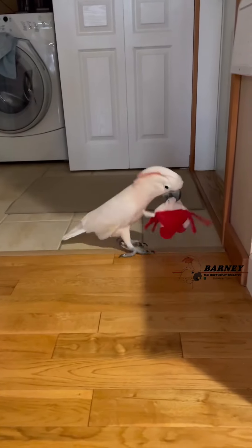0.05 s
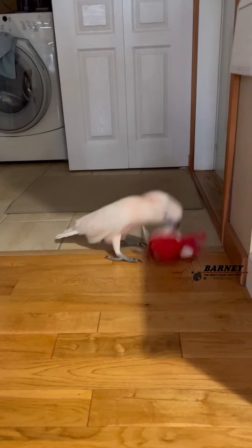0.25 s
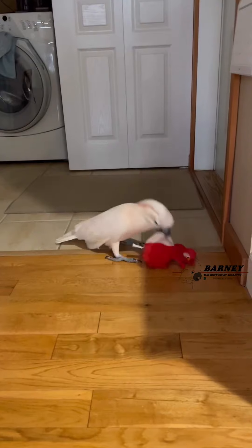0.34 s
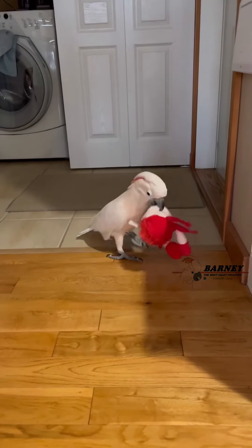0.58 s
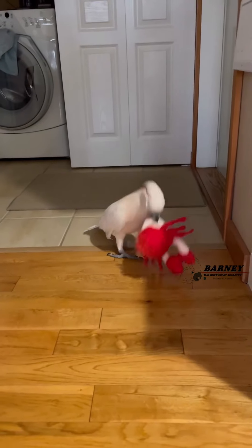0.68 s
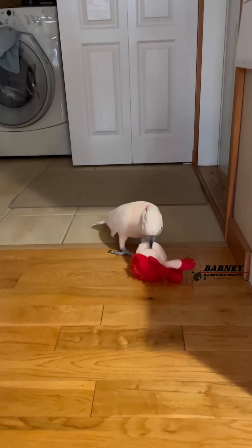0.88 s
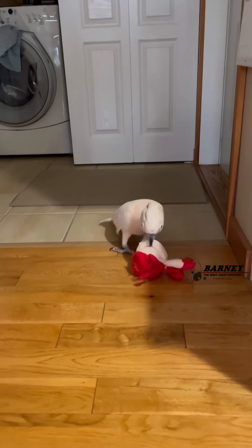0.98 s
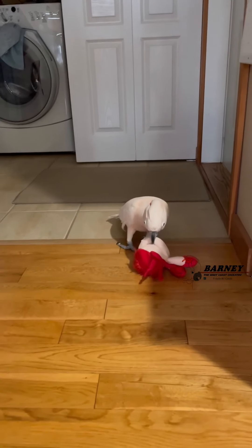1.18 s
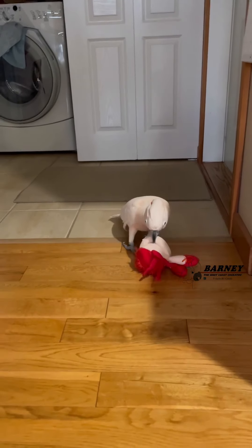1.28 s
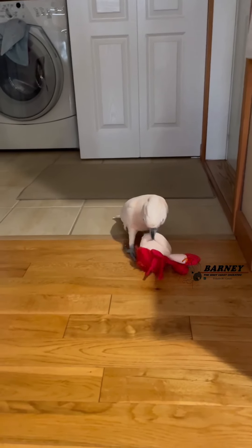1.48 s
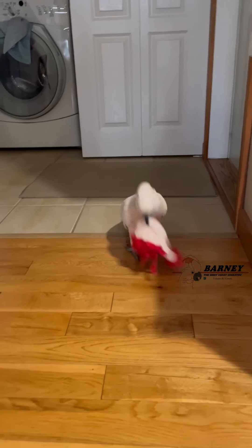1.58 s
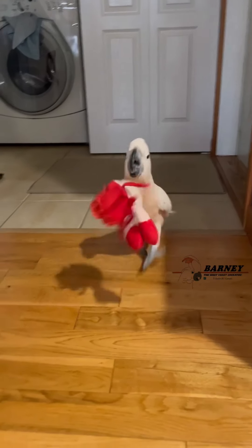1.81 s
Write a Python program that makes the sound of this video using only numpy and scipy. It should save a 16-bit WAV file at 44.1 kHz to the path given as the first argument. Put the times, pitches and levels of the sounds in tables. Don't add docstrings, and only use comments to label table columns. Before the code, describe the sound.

Two thumps of a toy on wooden boards, the first louder, amid brief claw squeaks and rustling

```python
import sys
import numpy as np
from scipy import signal
from scipy.fft import rfft, irfft, next_fast_len
from scipy.io import wavfile
from scipy.ndimage import map_coordinates

SR = 44100
rng = np.random.default_rng(int(sys.argv[2]) if len(sys.argv) > 2 else 0)


def dump_mix(stems):
    frames = np.atleast_2d(stems).T
    limited = np.clip(frames, -1, 1)
    pcm = np.round(limited * 32767).astype(np.int16)
    wavfile.write(sys.argv[1], SR, pcm)


def boost(x):
    u = np.asarray(x, float) / 20
    return 10 ** u


N = 81585


def unit(x):
    return x / np.sqrt(np.mean(x ** 2) + 1e-20)


def along(points, hz):
    f, v = np.transpose(points)
    return np.interp(np.log(hz + 1), np.log(f + 1), v)


def contour(points):
    s, db = np.transpose(points)
    return np.interp(np.arange(N) / SR, s, db)


def wobble(rate, size):
    knots = rng.standard_normal(int(size * rate / SR) + 4)
    return map_coordinates(knots, [np.arange(size) * rate / SR])


def filtered(x, response):
    m = next_fast_len(x.shape[-1] + 8192)
    spectrum = rfft(x, m) * response(np.fft.rfftfreq(m, 1 / SR))
    return irfft(spectrum, m)[..., :x.shape[-1]]


def add(track, s, x):
    part = track[max(round(s * SR), 0):][:len(x)]
    part += x[:len(part)]


def ports(mid, side, null_db=60):
    # f/Hz, level/dB
    side_over_mid = [(60, -36), (300, -15), (700, -10.5), (2400, -8.5), (7600, -3), (8400, 20.5),
                     (10700, 32.5), (11300, -1.5)]

    def turn(hz):
        return np.arctan(boost(np.minimum(along(side_over_mid, hz), null_db)))

    m = filtered(mid, lambda hz: np.cos(turn(hz)))
    s = filtered(side, lambda hz: 1j * np.sin(turn(hz)))
    return np.array([m + s, m - s])


def rumble():
    # t/s, level/dB
    strength = [(0, -44.5), (0.101, -49), (.21, -65), (.43, -44), (.6, -45), (.77, -55), (.9, -56),
                (1.06, -57), (1.141, -60), (1.22, -49), (1.3, -62), (1.55, -63), (1.719, -75), (1.85, -46)]
    centre_hz, width_hz = 56, 30
    noise = rng.standard_normal(N)
    shake = filtered(noise, lambda hz: np.exp(-((hz - centre_hz) / width_hz) ** 2))
    return boost(contour(strength)) * unit(shake)


def house():
    # f/Hz, density level/dB
    mid_spectrum = [(25, -38.5), (50, -7.5), (95, 0.5), (140, -13), (330, -13), (700, -26), (1500, -35),
                    (13000, -50)]
    # f/Hz, density level/dB
    side_spectrum = [(18, -42.5), (30, -11.5), (169, -5), (700, -6), (858, -4.5), (950, -17.5),
                     (4250, -24.5), (13000, -29)]
    mid_db, side_db, sway_db = -53.5, -65.5, 3.5
    mid = unit(filtered(rng.standard_normal(N), lambda hz: boost(along(mid_spectrum, hz))))
    side = unit(filtered(rng.standard_normal(N), lambda hz: boost(along(side_spectrum, hz))))
    mid = boost(mid_db + sway_db * wobble(4.724, size=N)) * mid
    return ports(mid, 0 * mid) + boost(side_db) * np.array([side, -side])


def rustle():
    # t/s, level/dB
    motion = [(0, -45), (0.089, -46.5), (0.139, -52), (.2, -47), (.3, -46), (0.498, -60), (0.621, -67),
              (.7, -57), (.79, -61), (.95, -66), (1.1, -69), (1.269, -87.5), (1.3, -60.5), (1.4, -66.5),
              (1.549, -67.5), (1.7, -69.5), (1.85, -72)]
    # f/Hz, density level/dB
    plush = [(120, -30), (300, -3), (700, -7), (1400, -9), (2500, -4.5), (5500, -8.5), (9000, -18),
             (13000, -17)]
    trim_db, flutter_db = -3, 3.9
    level = boost(contour(motion) + trim_db + flutter_db * wobble(27, size=N))
    hiss = filtered(rng.standard_normal((2, N)), lambda hz: boost(along(plush, hz)))
    return ports(*(level * unit(hiss)))


def squeaks():
    # middle t/s, length/s, level/dB, f/Hz
    slips = [(.012, .012, -42, 5800), (.013, 0.021, -40, 2600), (0.013, 0.013, -40.5, 3700),
             (.051, .011, -33, 3050), (.052, .01, -42.5, 4000), (0.075, .02, -36, 2950),
             (0.154, .014, -42.5, 3700), (.160, .012, -35, 3250), (0.185, 0.0058, -33.5, 3400),
             (1.462, 0.011, -55, 5970), (1.682, 0.015, -52.5, 3000), (1.678, .012, -52.5, 2227),
             (1.687, 0.022, -57, 5200), (1.679, 0.01, -46, 1200), (1.704, 0.017, -61.5, 3000),
             (1.796, 0.072, -67.5, 3550)]
    fall, wander, rasp, octave_db = 0.061, 0.06, 0.74, -18.5
    out = np.zeros(N)
    for s, length, db, hz in slips:
        u = np.linspace(-.5, .5, round(length * SR))
        drift = wobble(500, size=SR // 8)[:len(u)] * min(0.0072 / length, 1) ** 2
        sag = fall * u * min(0.01 / length, 1) ** 2
        phase = 2 * np.pi * np.cumsum(hz * (1 - sag + wander * drift)) / SR
        rough = 1 + rasp * min(0.031 / length, 1) * wobble(1200, size=SR // 8)[:len(u)]
        tone = np.sin(phase) + boost(octave_db) * np.sin(2 * phase)
        add(out, s - length / 2, boost(db) * np.cos(np.pi * u) ** 2 * rough * tone)
    return out


def ticks():
    # t/s, level/dB, f/Hz, t60/s
    early = [(.022, -38, 2870, .02), (0.1745, -45, 13200, 0.029), (0.1844, -37, 5430, 0.026),
             (.191, -38, 6250, 0.016), (0.2216, -26, 12500, .012), (0.2231, -35, 705, 0.018),
             (.233, -37.5, 660, 0.053), (0.2445, -18, 2970, 0.033), (.2490, -20, 1065, 0.06),
             (0.2502, -22.5, 5700, 0.051), (0.2495, -11.5, 11800, .015), (0.543, -53, 1500, 0.048)]
    # t/s, level/dB, f/Hz, t60/s
    late = [(.6515, -33.5, 13500, 0.023), (.6522, -33, 5770, .02), (.662, -45.5, 1150, .06),
            (.659, -38, 3000, 0.073), (.7338, -49, 4900, 0.023), (.745, -58, 6000, .02),
            (0.794, -40.5, 4380, .04), (0.8047, -22.5, 5100, 0.0099), (.806, -40.5, 1300, 0.11),
            (.812, -36, 3910, 0.094), (1.2846, -51.5, 2116, 0.12), (1.400, -58.5, 3020, 0.22),
            (1.4246, -43.5, 1670, 0.01), (1.4577, -56, 7600, 0.042), (1.4253, -57.5, 3270, 0.021),
            (1.52, -61.5, 3580, 0.01), (1.463, -57, 1000, .03), (1.572, -48, 12500, .015),
            (1.652, -59.5, 13000, 0.022), (1.668, -55.5, 3400, 0.09), (1.6779, -51.5, 2600, .05),
            (1.69, -55, 1300, 0.052)]
    q, broad_db, rise_s = 1.6, -12.5, 0.00017
    reach = 1.9
    out, t = np.zeros(N), np.arange(SR // 10) / SR
    for s, db, hz, t60 in early + late:
        burst = rng.standard_normal(len(t)) * boost(-60 * t / t60) * (1 - np.exp(-t / rise_s))

        def response(f):
            damping = 1j * f * hz / q
            peak = boost(broad_db) + damping / (hz * hz - f * f + damping)
            return peak / (1 + 1j * f / (reach * hz)) ** 2

        body = filtered(burst, response)
        add(out, s, boost(db) * body / np.abs(body).max() * 2)
    return out


def blows():
    # t/s, level/dB, contact length/ms
    contacts = [(.186, -51.5, 0.7), (0.2459, -17, 1.26), (0.2487, -12, 1.47), (0.2543, -11, 2.33),
                (0.2646, -17.5, 2.2), (0.691, -51, 2.6), (0.714, -51.5, 0.83), (0.744, -52, 1.5),
                (0.7992, -36.5, 0.68), (0.804, -19.5, 5.85), (.8135, -28.5, 4.6), (1.752, -46.5, 6.7),
                (1.785, -46, 4.6), (1.836, -36.5, 9.7)]
    # f/Hz, level/dB, t60/s
    modes = [(74, -6, 0.34), (101.2, -3.5, 0.15), (140, -6.5, 0.076), (160.3, -8, 0.079), (205, -3.5, 0.06),
             (284, 5, 0.069), (396.5, -2, .07), (457.6, -12, .06), (568.6, -8, 0.055), (639, -7, 0.045),
             (1017, -13, 0.051), (1300, -14, 0.033)]
    push, t = np.zeros(N), np.arange(SR // 2) / SR
    for s, db, ms in contacts:
        bump = np.hanning(max(round(ms * SR / 1000), 3))
        add(push, s, boost(db) * bump / bump.sum())
    ring = sum(boost(db - 60 * t / t60) * np.sin(2 * np.pi * hz * t) for hz, db, t60 in modes)
    return -signal.fftconvolve(push, ring)[:N]


def room(x):
    # f/Hz, t60/s
    decay = [(80, 0.51), (300, .5), (1000, 0.43), (4000, 0.35), (12500, 0.23), (14500, 0.091)]
    gap_s = .004
    hz, t, z = signal.stft(rng.standard_normal((2, SR)), SR, nperseg=512)
    t60 = along(decay, hz)[:, None]
    tail = signal.istft(z * boost(-60 * t / t60) / np.sqrt(t60), SR, nperseg=512)[1]
    delayed = np.pad(x, (round(gap_s * SR), 0))[None]
    wet = signal.fftconvolve(delayed, tail / np.linalg.norm(tail[0]), axes=1)
    return ports(*wet[:, :N])


def scene():
    boom_db, room_db = -8, -9
    low = blows()
    high = ticks() + squeaks()
    direct = ports(low + high, low + high, null_db=22) * boost([[.4], [-.4]])
    wet = boost(boom_db) * low + boost(room_db) * high
    late = np.arange(N) > .5 * SR
    reverberation = room(wet * ~late) + room(wet * late)
    return rumble() + house() + rustle() + direct + reverberation


def side_top(x):
    return filtered(x, lambda hz: boost(-18.5 * (hz > 13600)))


def roll_off(x):
    return signal.sosfilt(signal.butter(12, 16650, fs=SR, output="sos"), x)


def record(dry):
    # f/Hz, level/dB
    mic = [(1000, 3.5), (12500, -0.5), (14500, -6), (16200, -11.5), (16700, -43.5)]
    low_hz, ceiling = 49, 1.0
    x = filtered(dry, lambda hz: boost(along(mic, hz)) * (1j * hz / (low_hz + 1j * hz)) ** 4)
    mid, side = x.mean(axis=0), side_top(x[0] - x[1]) / 2
    x = np.array([mid + side, mid - side])
    mix = x / (1 + np.abs(x / ceiling) ** 6) ** (1 / 6)
    return roll_off(mix)


dry = scene()
out = record(dry)
dump_mix(out)
```